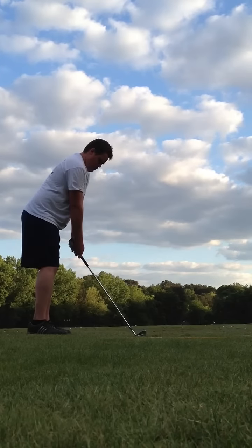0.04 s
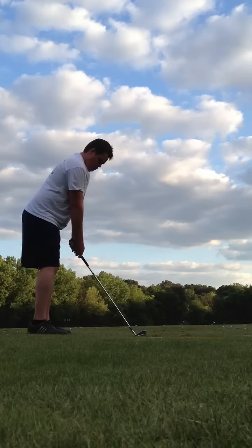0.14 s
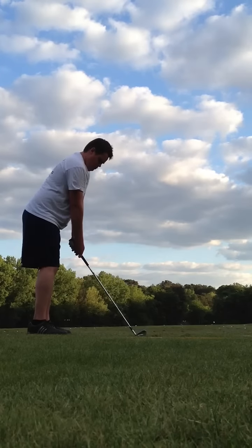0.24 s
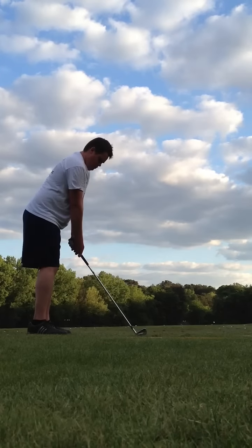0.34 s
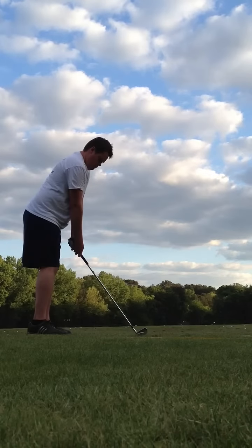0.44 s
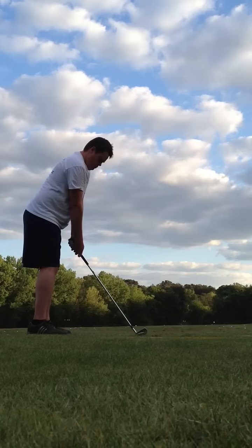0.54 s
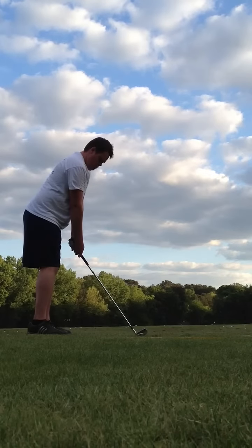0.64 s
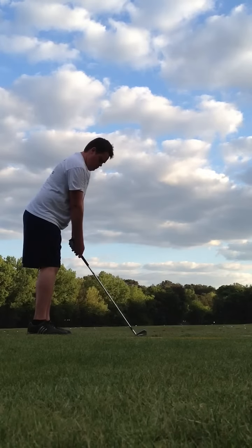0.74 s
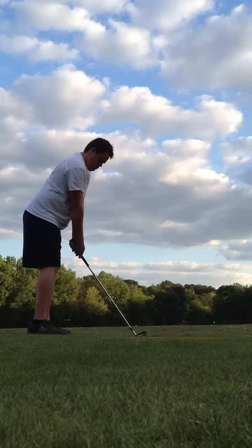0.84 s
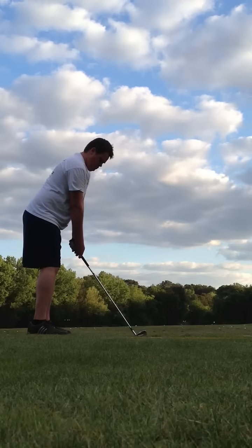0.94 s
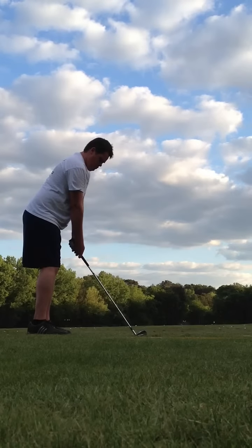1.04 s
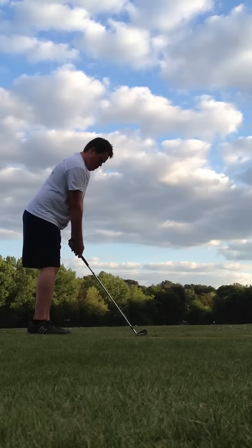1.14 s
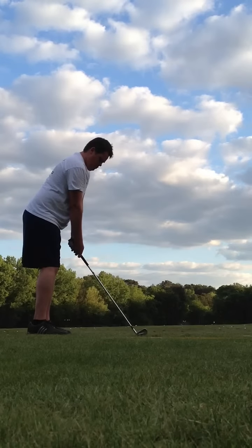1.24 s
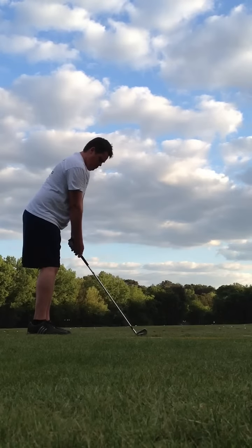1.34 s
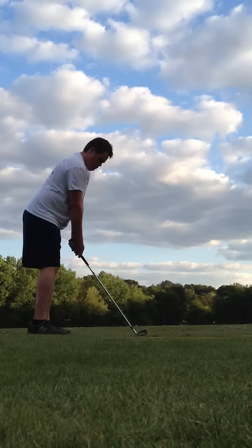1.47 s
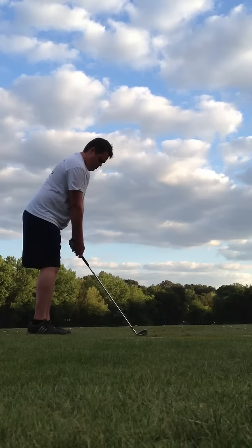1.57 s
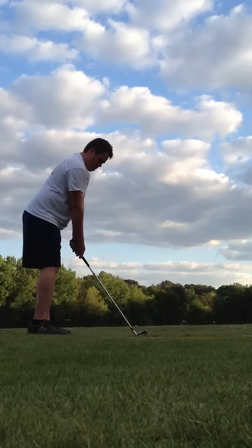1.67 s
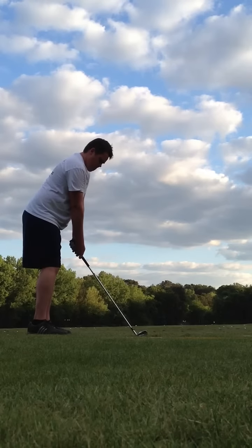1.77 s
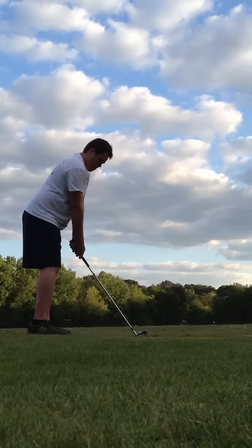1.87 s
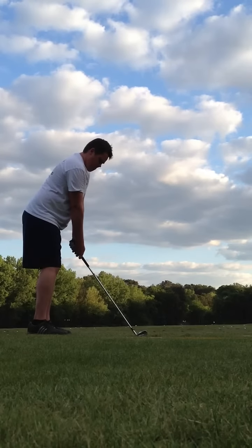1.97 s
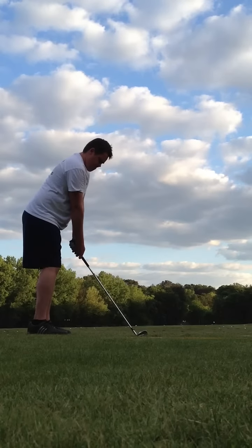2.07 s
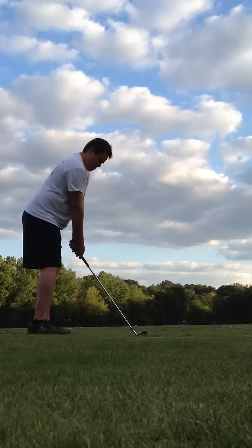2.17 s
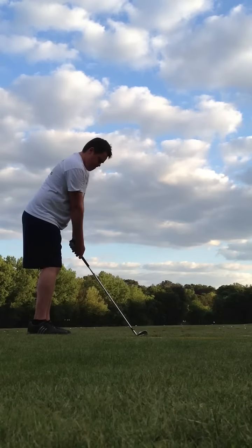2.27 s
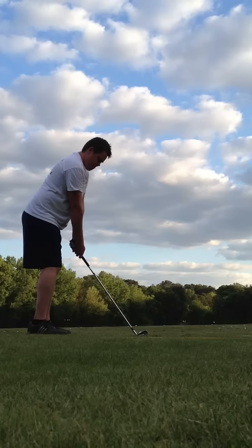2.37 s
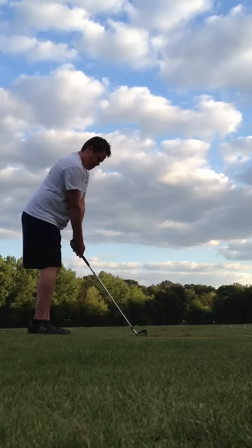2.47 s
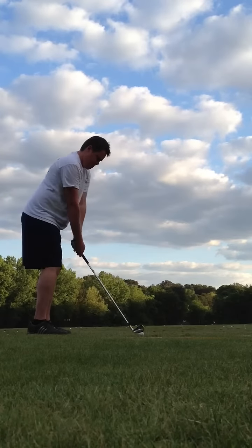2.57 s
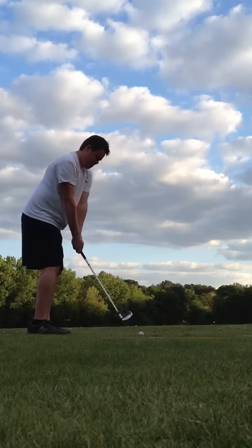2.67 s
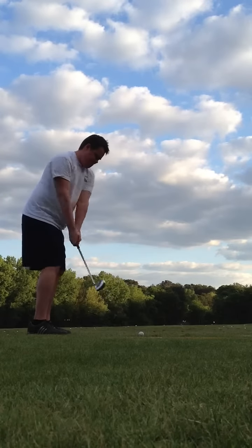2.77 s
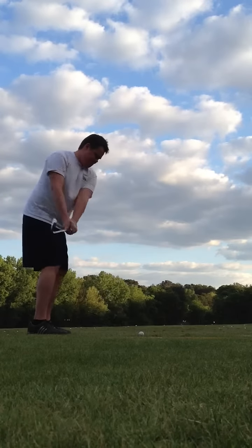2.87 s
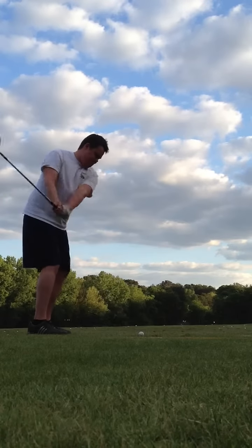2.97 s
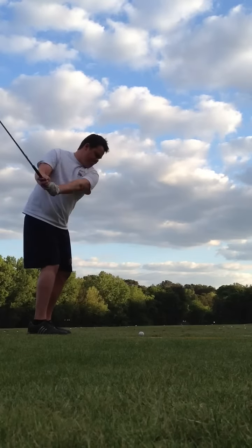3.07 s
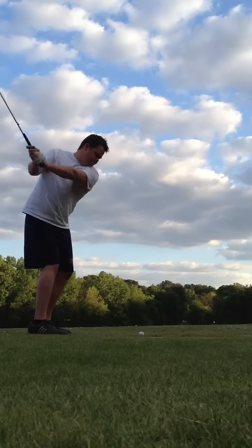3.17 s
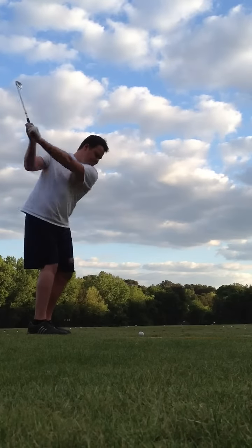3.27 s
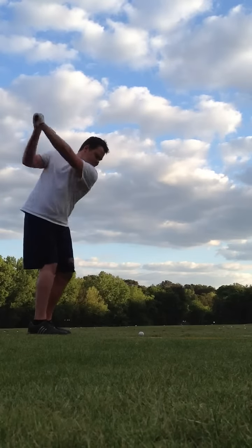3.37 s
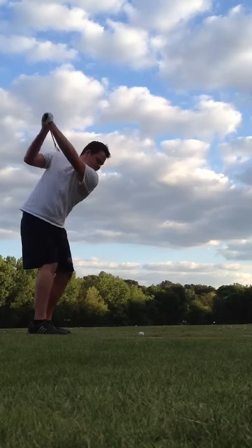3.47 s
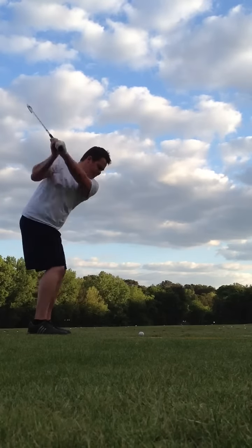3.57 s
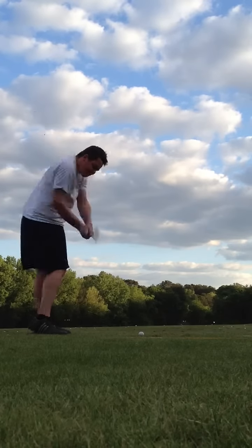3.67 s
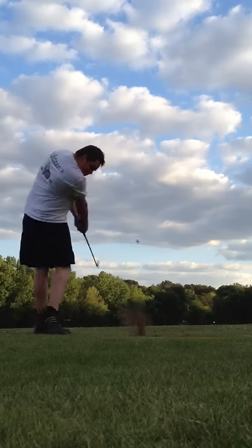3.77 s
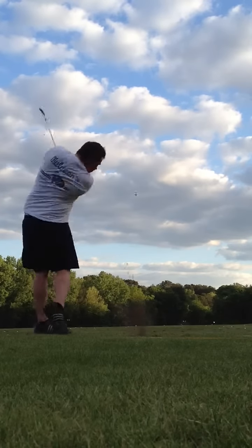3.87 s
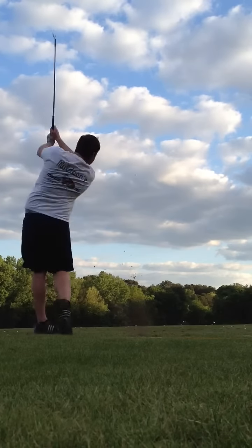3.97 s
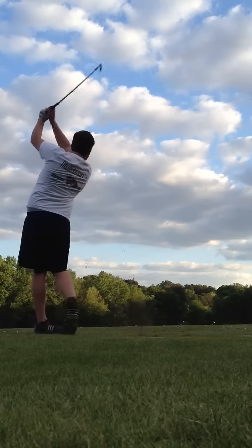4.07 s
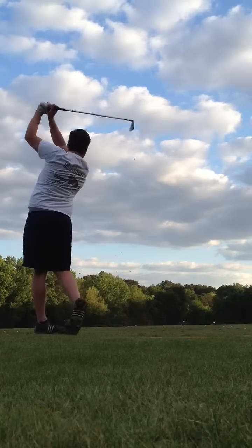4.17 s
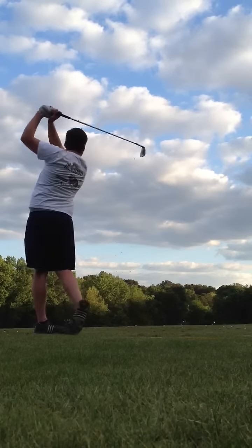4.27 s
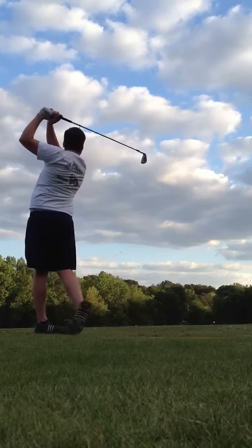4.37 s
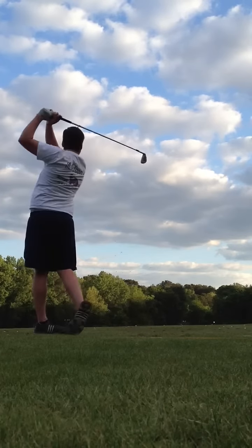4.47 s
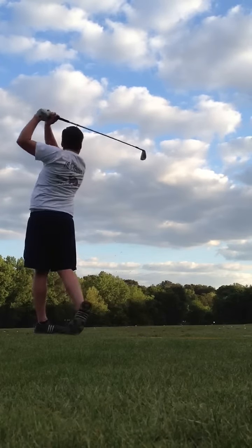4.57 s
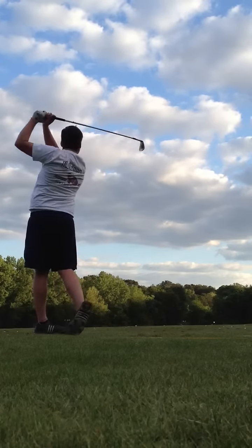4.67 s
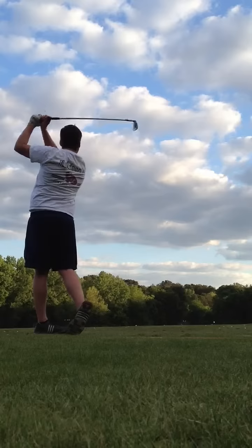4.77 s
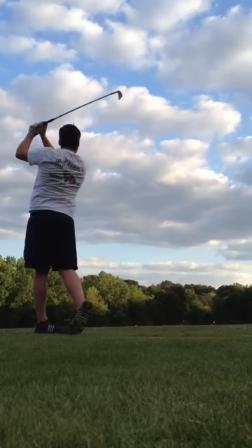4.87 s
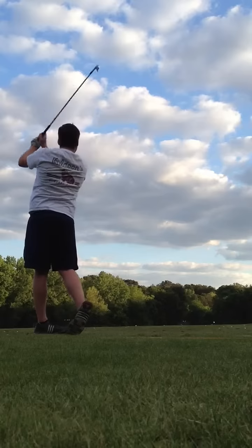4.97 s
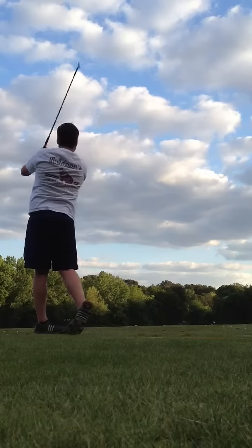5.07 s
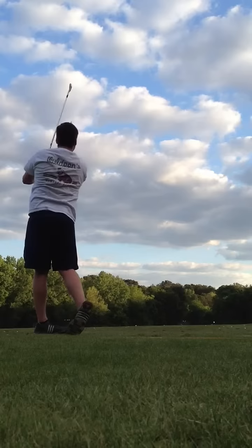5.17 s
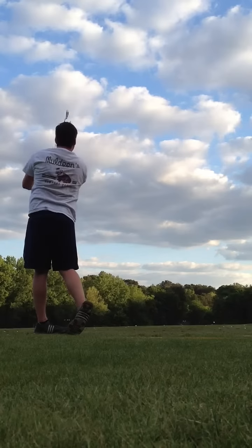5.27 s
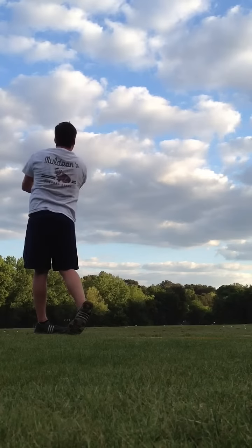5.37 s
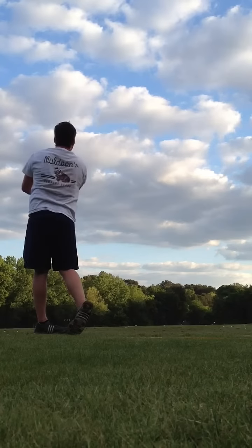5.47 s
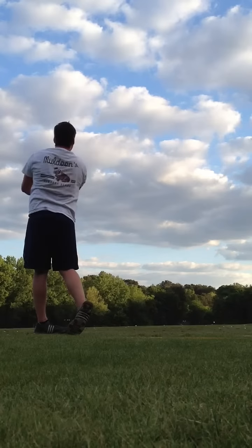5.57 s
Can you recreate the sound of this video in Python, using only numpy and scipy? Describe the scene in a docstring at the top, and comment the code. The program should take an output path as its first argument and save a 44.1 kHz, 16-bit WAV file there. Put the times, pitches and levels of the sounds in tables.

```python
"""An open range: a golfer grounds an iron, swings, and strikes the ball with one sharp click.
Pressure pulses, damped ring modes and a noise crack make the click; damped sines thump the turf and
noise throws up crumbs of soil; the tree line returns a faint wash. Songbirds whistle and trill as
gliding tones and chip as noise rasps, over distant traffic noise and the drone of one engine."""
import sys
import numpy as np
from scipy import signal
from scipy.fft import rfft, irfft
from scipy.io import wavfile
from scipy.ndimage import uniform_filter1d

SR = 44100
rng = np.random.default_rng(int(sys.argv[2]) if len(sys.argv) > 2 else 0)


def persist_wave(psi):
    """Save psi, clipped to +-1, as 16-bit WAV."""
    counts = np.round(np.clip(psi, -1, 1) * 32767).astype(np.int16)
    wavfile.write(sys.argv[1], SR, np.atleast_2d(counts).T)


N = 247401
TIME_S = np.arange(N) / SR
FREQ_HZ = np.fft.rfftfreq(N, 1 / SR)


def amp(db):
    """Decibels to gain."""
    return 10 ** (np.asarray(db) / 20)


def evened(x):
    """Scales to rms 1."""
    return x / np.sqrt(np.mean(x ** 2) + 1e-20)


def spectrum_gain(points):
    """(freq_hz, level_db) points as a gain for every frequency."""
    hz, db = np.transpose(points)
    return amp(np.interp(np.log(FREQ_HZ + 1), np.log(hz), db))


def curves(rows, t_s):
    """Every column of a time table, interpolated at t_s."""
    point_s, *columns = np.transpose(rows)
    return [np.interp(t_s, point_s, column) for column in columns]


def noise(gain):
    """Noise of rms 1 with the given spectrum shape."""
    return evened(irfft(rfft(rng.standard_normal(N)) * gain, N))


def wander(rate_hz):
    """Slow random curve of rms 1; its gain is halved at rate_hz."""
    return noise(1 / (1 + (FREQ_HZ / rate_hz) ** 4))


def dying(start_s, t60_s, rise_s=0.00034):
    """Envelope that rises quickly at start_s and decays 60 dB in t60_s."""
    age_s = np.maximum(TIME_S - start_s, 0)
    decay = np.exp(-np.minimum(np.log(1000) * age_s / t60_s, 50))
    return (1 - np.exp(-age_s / rise_s)) * decay


def resonate(x, pitch_hz, width_hz):
    """Resonance of peak gain 1 tracking pitch_hz: shift to 0 Hz, one-pole low-pass, shift back."""
    carrier = np.exp(2j * np.pi * np.cumsum(pitch_hz * np.ones(N)) / SR)
    pole = np.exp(-np.pi * width_hz / SR)
    return 2 * (carrier * signal.lfilter([1 - pole], [1, -pole], x / carrier)).real


def placed(start_s, sound):
    """A sound set into the scene at start_s."""
    return np.pad(sound, (max(round(start_s * SR), 0), N))[:N]


def burst(start_s, gain_at, envelope_at, size=32768):
    """Short stretch of coloured noise, rms 1 before its envelope."""
    hz = np.fft.rfftfreq(size, 1 / SR) + 1
    age_s = np.arange(size) / SR
    coloured = evened(irfft(rfft(rng.standard_normal(size)) * gain_at(hz)))
    return placed(start_s, coloured * envelope_at(age_s))


STRIKE_S = 3.7793
# face meets ball, ball springs off: time_s, pressure_peak (before the bass cut), decay_each_side_s
CONTACT_PULSES = [(3.7789, -0.1, .00008), (3.77933, .17, .00006), (3.78045, -0.28, 0.00013)]
# ring of club head and ball: pitch_hz, level_db, t60_s
RING_MODES = [(453, -33, 0.042), (760, -20, 0.0098), (1043, -26.5, 0.024), (1390, -34.5, 0.027),
              (2120, -23.5, 0.012), (2500, -16.5, 0.0089), (3150, -24.5, 0.014), (3890, -21.5, 0.011),
              (4450, -23, 0.011), (4730, -30.5, 0.016), (5450, -30.5, 0.017), (6030, -31.5, 0.022),
              (6430, -27, 0.017), (7160, -28, 0.017), (7850, -45, 0.043), (8250, -31, 0.015),
              (13200, -31, 0.0076)]
# crack spectrum shape: freq_hz, relative_level_db
CRACK_SPECTRUM = [(250, -9), (900, 7), (1350, -7), (1700, -17), (2300, -11), (4300, 3), (6000, -7),
                  (8400, 5), (9700, -14), (13500, -10), (15000, -16)]


def strike(crack_db=-29, crack_t60_s=0.025):
    """Sharp pressure pulses, the brief ring of head and ball, and a noise crack."""
    pulses = sum(peak * np.exp(-np.minimum(abs(TIME_S - time_s) / decay_s, 50))
                 for time_s, peak, decay_s in CONTACT_PULSES)
    ring = sum(amp(db) * dying(STRIKE_S, t60_s, 0.00014) * np.cos(2 * np.pi * hz * (TIME_S - STRIKE_S))
               for hz, db, t60_s in RING_MODES)
    crack = noise(spectrum_gain(CRACK_SPECTRUM)) * dying(3.7786, crack_t60_s, 0.00042)
    return pulses + ring + amp(crack_db) * crack


# blows of the sole on the turf: start_s, level_db (before the bass cut), pitch_hz, t60_s
TURF_THUMPS = [(1.7557, -34.5, 232, 0.017), (3.7769, -30, 600, 0.012), (3.779, -11.5, 327, 0.0099),
               (3.7879, -27, 247, 0.038)]
# tearing turf, spectrum shape: freq_hz, relative_level_db
DIVOT_SPECTRUM = [(300, 2), (1700, -16), (3000, -11), (4500, 0), (7000, -6), (8700, -10), (9800, -17),
                  (15000, -18)]


def turf(tear_db=-36, spray_db=-55, fall_db=-65, clump_rms_db=4.5):
    """The ground thumps as damped sines; torn roots and flying, pattering soil are shaped noise."""
    thumps = sum(amp(db) * dying(start_s, t60_s) * np.sin(2 * np.pi * hz * (TIME_S - start_s))
                 for start_s, db, hz, t60_s in TURF_THUMPS)
    tear = amp(tear_db) * dying(3.7872, 0.019, 0.0016)
    crumbs = amp(spray_db) * dying(3.797, 0.18, 0.0025) + amp(fall_db) * dying(3.93, 0.64, .03)
    clumped_crumbs = crumbs * amp(clump_rms_db * wander(400))
    return thumps + noise(spectrum_gain(DIVOT_SPECTRUM)) * (tear + clumped_crumbs)


# downswing: time_s, shaft_rush_level_db (before rush_trim_db), rush_upper_edge_hz, eddy_level_db,
# eddy_pitch_hz
SWING_CURVES = [(3.70, -74, 3000, -68, 380), (3.722, -58, 3500, -59, 440), (3.736, -47, 4830, -56, 520),
                (3.75, -46.5, 6200, -41.5, 570), (3.763, -45.5, 7800, -43, 600),
                (3.771, -55.5, 8000, -49, 583), (3.779, -63, 8000, -49, 560)]


def swish(rush_trim_db=-1, eddy_width_hz=220, low_edge_hz=1700, fizz_db=-20):
    """Air rushes past the shaft, brightening as its upper edge rises; the head sheds lower eddies."""
    rush_db, edge_hz, eddy_db, eddy_hz = curves(SWING_CURVES, TIME_S)
    hz, frame_s, bins = signal.stft(rng.standard_normal(N), SR, nperseg=128)
    hz = hz[:, None]
    low_cut = hz ** 2 / np.hypot(hz ** 2, low_edge_hz ** 2)
    high_cut = 1 / (1 + (hz / np.interp(frame_s, TIME_S, edge_hz)) ** 6)
    bins *= (amp(fizz_db) + high_cut) * low_cut
    rush = signal.istft(bins, SR, nperseg=128)[1][:N] / np.sqrt(2 * edge_hz / SR)
    once = resonate(rng.standard_normal(N), eddy_hz, eddy_width_hz)
    eddies = evened(resonate(once, eddy_hz, eddy_width_hz))
    swinging = (TIME_S > SWING_CURVES[0][0]) & (TIME_S < SWING_CURVES[-1][0])
    return swinging * (amp(rush_trim_db + rush_db) * rush + amp(eddy_db) * eddies)


# club brushing the grass at address: time_s, level_db
BRUSH_LEVEL = [(1.67, -72), (1.705, -58), (1.73, -57.5), (1.755, -55.5), (1.78, -73)]


def brush(centre_hz=580, half_width_hz=190):
    """The sole slides softly over the grass: a low band of noise."""
    time_s, db = np.transpose(BRUSH_LEVEL)
    band = 1 / (1 + ((FREQ_HZ - centre_hz) / half_width_hz) ** 6)
    return np.interp(TIME_S, time_s, amp(db), 0, 0) * noise(band)


# small ticks of club, grass, shoes and, just after the strike, clods of the divot:
# start_s, level_db, centre_hz, width_octaves (std), t60_s
SMALL_TICKS = [(.302, -59, 4100, .22, 0.035), (.921, -57, 4100, 0.37, 0.029), (1.04, -63.5, 3900, .4, .03),
               (1.177, -59.5, 3900, .35, .03), (1.643, -62, 4170, 0.31, .08), (1.7535, -42.5, 5500, 1, .02),
               (1.758, -51.5, 7100, .55, 0.034), (1.867, -63, 8500, .6, 0.056),
               (1.884, -44, 5140, 0.76, 0.02), (2.146, -66, 3700, 0.36, .05),
               (2.181, -58, 3300, 0.43, .035), (2.214, -47.5, 3770, .17, 0.021),
               (2.215, -63, 7000, 0.35, .015), (2.477, -60.5, 4000, 0.55, .03),
               (2.758, -54.5, 3500, .25, .025), (2.815, -50.5, 4900, 1, 0.011),
               (3.337, -63, 3800, 0.38, 0.037), (3.7904, -41, 7000, 0.28, 0.01),
               (3.801, -46.5, 5760, 0.41, 0.023), (3.808, -48, 5470, 0.48, 0.021),
               (4.511, -64, 4000, .4, .03), (4.542, -63, 5200, 0.39, 0.037),
               (4.929, -57.5, 5000, 0.57, 0.079), (4.955, -62, 4300, 0.59, 0.086)]


def ticks():
    """Dry little snaps of club, grass, shoes and divot clods, each a fast-dying band of noise."""
    out = np.zeros(N)
    for start_s, db, centre_hz, width_octaves, t60_s in SMALL_TICKS:
        out += amp(db) * burst(start_s,
                               lambda hz: np.exp(-.5 * (np.log2(hz / centre_hz) / width_octaves) ** 2),
                               lambda age_s: amp(-60 * age_s / t60_s))
    return out


# scattered return, spectrum shape: freq_hz, relative_level_db
RETURN_SPECTRUM = [(200, 6), (600, 5), (1700, -7), (4600, -1), (8000, -8), (9700, -20), (15000, -11)]


def tree_line(level_db=-58, t60_s=1.16):
    """The click comes back from field and trees as a faint wash of decaying noise."""
    return amp(level_db) * noise(spectrum_gain(RETURN_SPECTRUM)) * dying(3.785, t60_s, 0.009)


NOTE_BOW_DB, NOTE_EDGE_S = 4.5, 0.0034  # mid-note fullness, soft edges
TREMOR_RATIO = 0.0063  # rms pitch quiver (before it is cut to the note)
SWAY_RATE_HZ = 16


def note(start_s, length_s, first_hz, last_hz, arch_hz, level_db, swell_db, sway_hz=0):
    """Age, phase and loudness of one note: an arched glide that swells or fades."""
    age_s = np.arange(round(length_s * SR)) / SR
    along = age_s / length_s
    bow = 4 * along * (1 - along)
    glide_hz = first_hz + (last_hz - first_hz) * along + arch_hz * bow
    pitch_hz = glide_hz + sway_hz * np.sin(2 * np.pi * SWAY_RATE_HZ * age_s)
    tremor = evened(uniform_filter1d(rng.standard_normal(SR), size=160))[:len(age_s)]
    phase = 2 * np.pi * np.cumsum(pitch_hz * (1 + TREMOR_RATIO * tremor)) / SR
    edges = np.clip(np.minimum(age_s, length_s - age_s) / NOTE_EDGE_S, 0, 1)
    loudness = edges * amp(level_db + swell_db * (along - .5) + NOTE_BOW_DB * (bow - 1))
    return age_s, phase, loudness


def whistle(row, third_db=-19):
    """A clear note; its overtones bloom in its middle."""
    *shape, octave_db = row
    age_s, phase, loudness = note(*shape)
    bloom = np.sin(np.pi * age_s / age_s[-1])
    overtones = bloom * (np.sin(2 * phase) + amp(third_db) * np.sin(3 * phase))
    return placed(row[0], loudness * (np.sin(phase) + amp(octave_db) * overtones))


TRILL_HZ, TRILL_GROW_S, TRILL_DEPTH = 62.6, .025, .85


def trill(row, shake_rad=.7):
    """A note shaken in pitch and loudness at one rate, in some cases after a clear opening."""
    *shape, clear_s = row
    age_s, phase, loudness = note(*shape)
    depth = TRILL_DEPTH * np.clip(.5 + (age_s - clear_s) / (2 * TRILL_GROW_S), 0, 1)
    beat = 2 * np.pi * TRILL_HZ * age_s
    shaken = np.sin(phase + shake_rad * depth * np.cos(beat))
    return placed(row[0], loudness * (1 + depth * np.sin(beat)) * shaken)


def warble(start_s, length_s, pitch_hz, glide_hz, sway_hz, level_db):
    """A thin gliding note that may sway up and down."""
    _, phase, loudness = note(start_s, length_s, pitch_hz, pitch_hz + glide_hz, 0, level_db, 0, sway_hz)
    return placed(start_s, loudness * np.sin(phase))


# near bird's clear notes:
# start_s, length_s, first_hz, last_hz, arch_hz, level_db, swell_db (over the note), octave_db
NEAR_WHISTLES = [(0.078, 0.067, 3080, 3200, 64, -59.5, 2, -35),
                 (0.14, 0.061, 2230, 1750, -140, -70, -10, -35),
                 (0.251, 0.12, 2205, 2155, -36, -57, 5.5, -35), (2.426, .108, 2380, 2355, 64, -68, 0, -1),
                 (2.656, 0.066, 2060, 2140, -47, -67.5, 5, -30), (3.494, 0.1, 2370, 2515, 18, -67, -2, 2),
                 (4.336, 0.15, 3070, 3090, 24, -74, -14, -30), (4.533, 0.051, 3140, 3140, 0, -61.5, 0, -30),
                 (4.773, .082, 2220, 2020, -67, -67, 3, -30), (4.889, .086, 2730, 2660, -3, -66, 7, -30),
                 (4.98, .092, 2285, 2320, 21, -72.5, 2, -30), (5.489, 0.045, 3290, 3540, -40, -69, 2, -30),
                 (5.542, 0.064, 3000, 2230, -47, -69, -10, -29)]
# near bird's trilled notes:
# start_s, length_s, first_hz, last_hz, arch_hz, level_db, swell_db (over the note), clear_opening_s
NEAR_TRILLS = [(0, 0.084, 2620, 2850, -35, -65, -6, 0), (2.541, 0.1, 2430, 2720, 60, -66, 4, 0),
               (2.713, .212, 2185, 2225, 132.5, -62, -9, .085),
               (3.596, 0.11, 2490, 2430, 127, -62.5, 1, 0.023),
               (3.785, .19, 2154, 2296, 40, -62.5, -16, 0.052)]
# farther bird: start_s, length_s, pitch_hz, glide_hz, sway_hz, level_db (before far_trim_db)
FAR_WARBLES = [(.255, 0.043, 3550, -100, -150, -73), (.938, .04, 3650, -800, -100, -73),
               (.995, .035, 3400, -500, 0, -73), (1.512, 0.055, 2740, 51, 2, -74),
               (2.865, 0.16, 2860, 70, -160, -71.5), (3.28, .035, 2680, -50, 0, -75),
               (3.342, 0.048, 2410, -20, 0, -75), (3.42, .05, 3550, -30, 0, -76),
               (3.63, 0.037, 3420, 182, 2, -72), (3.898, 0.097, 3250, -110, 1, -67),
               (4.445, 0.033, 3090, -320, 0, -68), (4.78, 0.037, 3580, -380, 0, -68),
               (5.04, .05, 2700, 170, 0, -71), (5.19, .05, 3190, -100, 0, -76),
               (5.44, 0.066, 5520, -20, 0, -77)]


def birds(far_trim_db=-1, wet_db=-14, far_wet_db=-4, t60_s=0.58, flutter_rms_db=1, far_flutter_rms_db=3):
    """Nearly pure whistles, some trilled, echoed by the trees; the far bird flickers more."""
    near = sum(map(whistle, NEAR_WHISTLES)) + sum(map(trill, NEAR_TRILLS))
    far = amp(far_trim_db) * sum(warble(*row) for row in FAR_WARBLES)
    tail = (rng.standard_normal(N) * dying(0.01, t60_s, 0.009))[:SR]
    echo_feed = amp(wet_db) * near + amp(far_wet_db) * far
    echo = signal.fftconvolve(echo_feed, tail / np.linalg.norm(tail))[:N]
    flutter = wander(70)
    direct = near * amp(flutter_rms_db * flutter) + far * amp(far_flutter_rms_db * flutter)
    return np.sqrt(2) * (direct + echo)  # sine peak to rms


# harsh chips: start_s, level_db, centre_hz (before the offsets), half_width_hz, length_s, answer_t60_s
BIRD_CHIPS = [(0.317, -56, 4850, 845, 0.031, 0.72), (1.25, -57, 4980, 850, 0.031, 0.64),
              (1.863, -52.5, 5500, 1200, 0.011, 0.64), (1.884, -62.5, 8200, 3000, 0.028, 0.58),
              (1.885, -59, 6500, 600, 0.087, 1), (2.713, -57.5, 4800, 850, 0.022, 0.81),
              (4.576, -57, 4900, 855, 0.041, 0.79)]


def chips(echo_db=-6, rasp_rms_db=1.0, rise_s=0.0074, echo_rise_s=0.018, rasp_up_hz=80, echo_down_hz=120):
    """A short noise rasp from inside the trees; the foliage answers more slowly and a little lower."""
    def band(hz, centre_hz, half_width_hz):
        """Flat-topped pass band."""
        return 1 / np.sqrt(1 + abs((hz - centre_hz) / half_width_hz) ** 6)

    out = np.zeros(N)
    for start_s, db, centre_hz, half_width_hz, length_s, t60_s in BIRD_CHIPS:
        rasp = burst(start_s, lambda hz: band(hz, centre_hz + rasp_up_hz, half_width_hz),
                     lambda age_s: (1 - np.exp(-age_s / rise_s)) * np.exp(-(age_s / length_s) ** 2))
        answer = burst(start_s, lambda hz: band(hz, centre_hz - echo_down_hz, half_width_hz),
                       lambda age_s: (1 - np.exp(-age_s / echo_rise_s)) * amp(echo_db - 60 * age_s / t60_s))
        out += amp(db) * (rasp + answer)
    return out * amp(rasp_rms_db * wander(200))


# distant traffic: time_s, level_db (before traffic_trim_db)
TRAFFIC_CURVE = [(0, -56), (1.1, -58), (1.95, -54), (2.45, -55), (2.75, -58.5), (3.7, -56.5), (4.6, -55.5),
                 (5.35, -53), (5.61, -56)]
# traffic spectrum shape: freq_hz, relative_level_db
TRAFFIC_SPECTRUM = [(25, -28), (55, -28), (80, -19), (110, -8), (150, -0.5), (190, 0.5), (230, 3),
                    (280, -6), (380, -14), (600, -29), (1200, -51)]
# far engine: time_s, level_db (before drone_trim_db)
ENGINE_CURVE = [(0, -65), (.55, -58.5), (1.5, -65), (1.75, -53), (2.5, -57), (3.6, -57), (4.7, -54.5)]
# soft hiss, spectrum shape: freq_hz, relative_level_db
AIR_SPECTRUM = [(240, -15.5), (400, -3.5), (600, -7.5), (920, -10), (1220, -15.5), (1600, -19),
                (2600, -20.5), (3400, -21), (4500, -24.5), (7000, -28), (8300, -31.5), (9900, -39.5),
                (13200, -28.5), (15300, -30)]
ENGINE_START_HZ, ENGINE_CRUISE_HZ, ENGINE_SETTLE_S = 231.25, 177.5, .6  # it slows to a steady speed


def background(traffic_trim_db=1, air_db=-63, air_follows=0.4, drone_trim_db=-1, waver_rms_hz=0.65):
    """Traffic rumble, one engine note wavering in pitch, and a hiss that swells a little with traffic."""
    rumble_db, = curves(TRAFFIC_CURVE, TIME_S)
    engine_db, = curves(ENGINE_CURVE, TIME_S)
    slowing = np.exp(-TIME_S / ENGINE_SETTLE_S)
    engine_hz = ENGINE_CRUISE_HZ + (ENGINE_START_HZ - ENGINE_CRUISE_HZ) * slowing
    phase = 2 * np.pi * np.cumsum(engine_hz + waver_rms_hz * wander(3.14)) / SR
    engine = np.sqrt(2) * amp(drone_trim_db + engine_db) * np.sin(phase)
    rumble = amp(traffic_trim_db + rumble_db) * noise(spectrum_gain(TRAFFIC_SPECTRUM))
    hiss_db = air_db + air_follows * (rumble_db - rumble_db.mean())
    return engine + rumble + amp(hiss_db) * noise(spectrum_gain(AIR_SPECTRUM))


# swells in the rumble: peak_s, level_db, centre_hz, half_width_hz, half_length_s (to 1/e)
RUMBLE_SWELLS = [(.45, -57, 239, 17, .12), (2.38, -52, 243, 21, 0.14), (5.35, -61.5, 107, 23, 0.28)]


def swells():
    """Narrow bands of the rumble rise and fall away."""
    out = np.zeros(N)
    for peak_s, db, centre_hz, half_width_hz, half_length_s in RUMBLE_SWELLS:
        band = noise(1 / (1 + ((FREQ_HZ - centre_hz) / half_width_hz) ** 4))
        out += amp(db) * np.exp(-((TIME_S - peak_s) / half_length_s) ** 2) * band
    return out


def scene(radiation_hz=130):
    """The golfer in front, birds and traffic behind."""
    # a club head radiates little bass
    small_source = signal.butter(2, radiation_hz, "highpass", fs=SR, output="sos")
    blows = signal.sosfilt(small_source, strike() + turf())
    golfer = blows + swish() + brush() + ticks() + tree_line()
    return (golfer + birds() + chips() + background() + swells())[None]


def record(dry, bass_cut_hz=70, band_edge_hz=15400):
    """The microphone sheds deep bass; a low-pass then limits the band."""
    thin = signal.sosfilt(signal.butter(2, bass_cut_hz, "highpass", fs=SR, output="sos"), dry)
    low_pass = signal.firwin(511, band_edge_hz, window=("kaiser", 9), fs=SR)
    return signal.oaconvolve(thin, low_pass[None], "same")


dry = scene()
out = record(dry)
persist_wave(out)
```